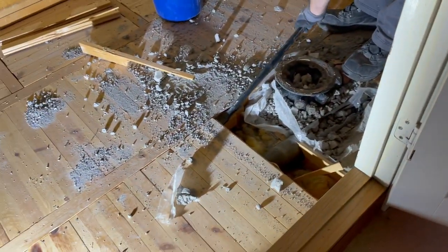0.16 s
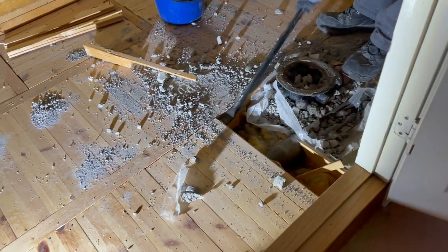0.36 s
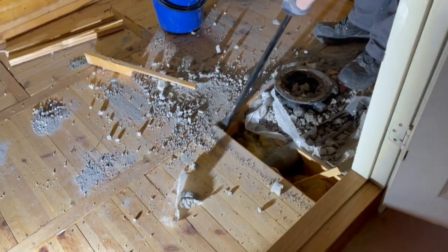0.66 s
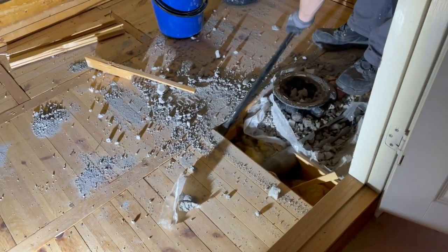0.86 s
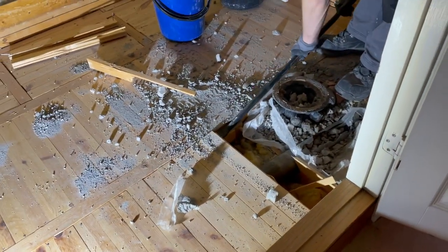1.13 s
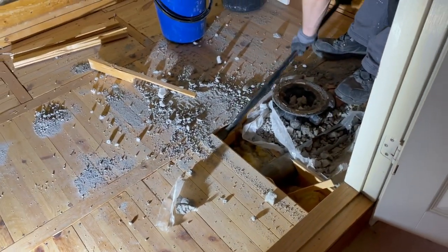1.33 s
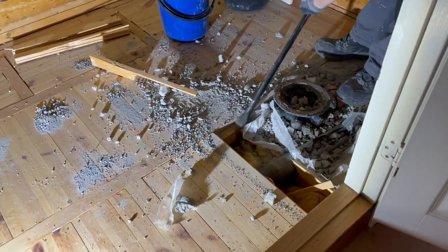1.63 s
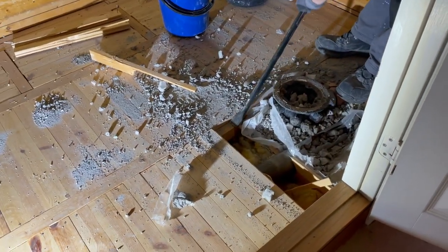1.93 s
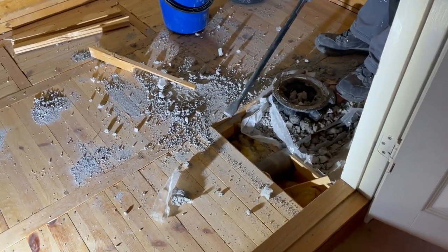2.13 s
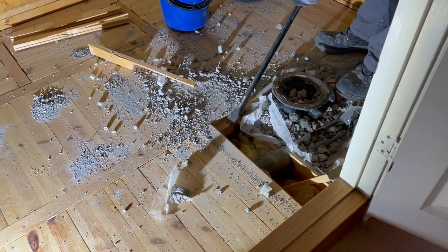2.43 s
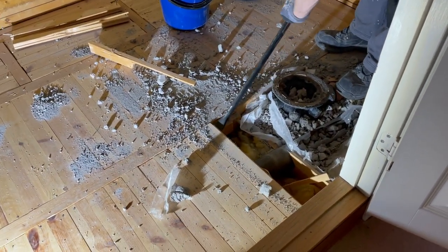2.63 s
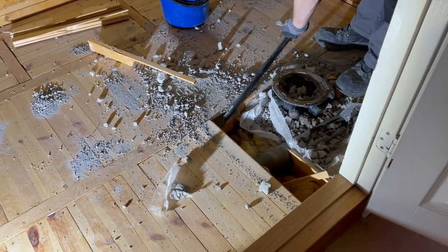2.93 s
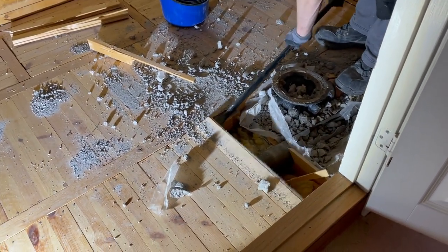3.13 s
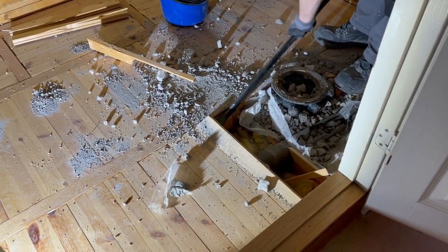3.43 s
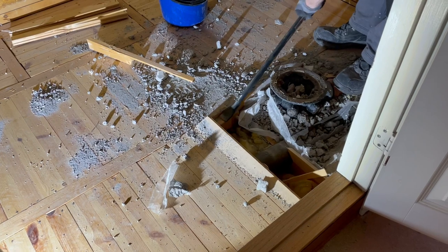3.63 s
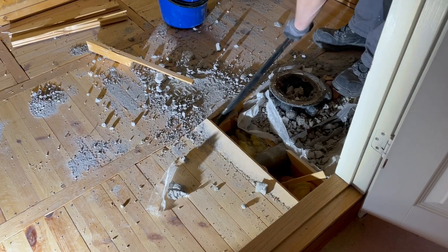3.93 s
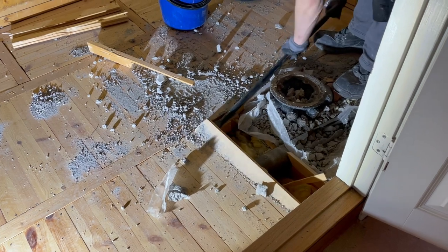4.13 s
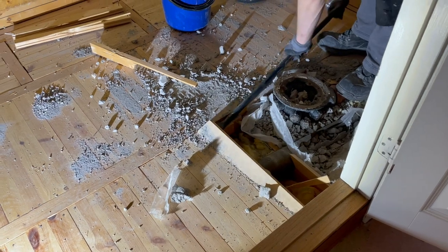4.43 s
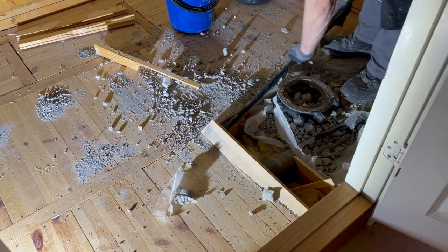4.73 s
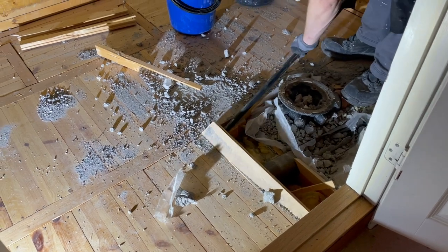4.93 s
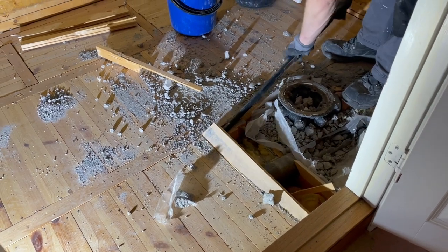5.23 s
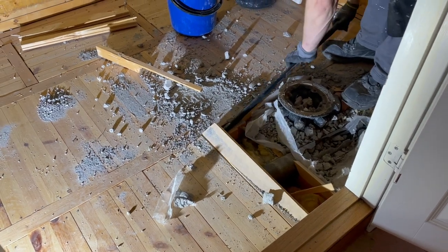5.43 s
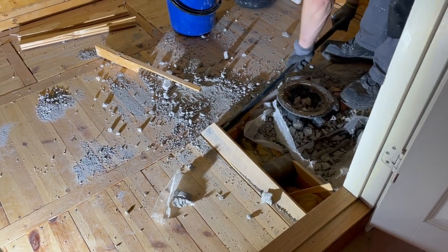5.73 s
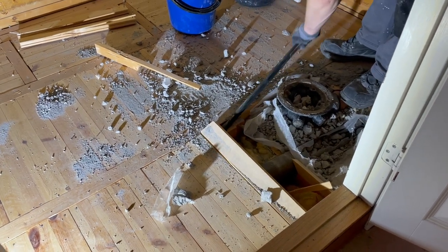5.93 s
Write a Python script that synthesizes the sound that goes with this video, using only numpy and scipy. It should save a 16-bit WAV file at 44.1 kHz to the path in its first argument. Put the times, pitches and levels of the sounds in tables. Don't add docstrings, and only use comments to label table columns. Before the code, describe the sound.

A steel bar jabs and pries under a hollow wooden floor, grinding through grit with heavy thuds, sharp cracks and skittering stone chips indoors.

```python
import sys
import numpy as np
from scipy import signal
from scipy.fft import rfft, irfft, next_fast_len
from scipy.io import wavfile
from scipy.ndimage import uniform_filter1d

SR = 44100
rng = np.random.default_rng(int(sys.argv[2]) if len(sys.argv) > 2 else 0)


def invert_db(x):
    u = np.asarray(x, float) / 20
    return 10 ** u


def unload_wav(signal):
    wavfile.write(
        sys.argv[1],
        SR,
        np.round(np.clip(np.atleast_2d(signal).T, -1, 1) * 32767).astype(np.int16),
    )


N = 268039
STEP = 64

# t/s, crack level/dB, joist boom level/dB, beam boom level/dB, board boom level/dB
BLOWS = [(0.491, -4.5, -24.5, -29.5, -51), (0.6926, 5, -9.5, -11, -6), (1.7237, -8, -20.5, -7.5, -7.5),
         (2.4579, -45, -20, -27, -30), (2.5249, -21, -27.5, -60, -22), (2.6301, 0, -7.5, -10.5, -6.5),
         (3.185, 3, -37, -30, -10), (3.7996, -15, -10.5, -13.5, 0), (4.121, -10, -20, -26, -16.5),
         (4.1706, -15, -31, -62, -35), (4.6027, 5.5, -94, -47, -20), (5.0417, -14.5, -17, -20, -27),
         (5.5162, -44, -48.5, -56, -27), (5.6171, -9, -39, -71, -24)]
# f/Hz, level/dB, t60/s
JOISTS = [(46.27, 4.5, 1), (59.2, -12, 0.71), (68, 7.5, 0.26), (84.4, 5, 0.43), (101.8, 8.5, 0.23)]
# f/Hz, level/dB, t60/s
BOARDS = [(141.5, 3, 0.4), (170.4, -5, 0.71), (182.4, 1.5, 0.36), (203.2, 3, 0.24), (222.2, -4, 0.4),
          (268, -2, 0.43), (369.5, -13.5, 0.64), (400.3, -8.5, 0.56), (466.6, -1.5, 0.18),
          (565, -0.5, 0.28), (596, -7.5, 0.33), (754, 0.5, 0.19), (1030, 7.5, 0.052)]
# f/Hz, level/dB
GRIT = [(800, -4.5), (1300, 7.5), (1750, -3.5), (2300, 5), (3300, 5.5), (4500, 2.5), (6000, -9.5),
        (9000, -8.5)]
# f/Hz, level/dB
DUST = [(6000, -19), (9000, -11), (11000, -21), (13800, -11), (15500, -23), (16300, -28.5), (17000, -69)]
# f/Hz, level/dB
RASP = [(150, 2), (300, 1), (600, -3), (1100, -11), (1500, -7.5), (2500, -36.5)]


def evened(x):
    return x / np.sqrt(np.mean(x ** 2) + 1e-20)


def read(points, hz):
    f, value = np.transpose(points)
    return np.interp(np.log(hz + 1), np.log(f + 1), value)


def add(mix, s, sound):
    part = mix[..., round(s * SR):][..., :sound.shape[-1]]
    part += sound[..., :part.shape[-1]]


def causal(points):
    level_db = read(points, abs(np.fft.fftfreq(2048, 1 / SR)))
    log_gain = np.log(invert_db(np.maximum(level_db, -90)))
    taps = np.fft.ifft(np.exp(np.conj(signal.hilbert(log_gain)))).real[:1024]
    return taps / np.linalg.norm(taps)


def colour(x, points):
    return signal.oaconvolve(x, causal(points))[:len(x)]


def ring(hz, t60, seconds):
    t = np.arange(round(seconds * SR)) / SR
    return invert_db(-60 * t / t60) * np.sin(2 * np.pi * hz * t)


def through(x, modes, damping):
    body = sum(invert_db(db) * ring(hz, damping * t60, .5) for hz, db, t60 in modes)
    return signal.oaconvolve(x, body / np.linalg.norm(body))[:len(x)]


def slip_sizes(spread_db):
    return invert_db(spread_db * np.minimum(rng.exponential(1, N), 5))


def grains(per_s, spread_db, length_s):
    size = slip_sizes(spread_db) * (rng.random(N) < per_s / SR)
    puffs = signal.lfilter([1], [1, -np.exp(-1 / (length_s * SR))], size)
    return evened(puffs * rng.standard_normal(N))


def stillness():
    # f/Hz, density level/dB per Hz
    air = [(28, -10), (48, 0), (78, -16), (200, -33), (700, -29), (2500, -36), (5000, -46), (16000, -58)]
    z = rfft(rng.standard_normal((2, N))) * invert_db(read(air, np.fft.rfftfreq(N, 1 / SR)))
    return invert_db(-56) * evened(irfft(z, N))


def bout(s, db, rise_s, fall_s, bend):
    t = np.arange(0, N + STEP, STEP) / SR - s
    drop_db = 20 * np.maximum(-t / abs(rise_s), t / abs(fall_s)) ** bend
    return invert_db(2 * np.maximum(db - drop_db, -140))


def strokes():
    # peak t/s, force level/dB, rise/s, fall over 20 dB/s, lean level/dB.
    pries = [
        (1.44, -51, 0.026, 0.52, 14),
        (1.55, -45.5, 0.14, 0.21, 18),
        (3.515, -45.5, .02, 0.16, 13),
        (3.6, -45, 0.077, .12, 12),
        (3.78, -28, 0.055, 0.1046, 7.5),
        (5.97, -46, 0.13, -4.5, 12),
    ]
    presses = [
        (0.4, -47, 0.064, 0.3, 8),
        (2.462, -49.5, 0.0052, 0.1, 12.5),
        (2.57, -46, 0.061, 0.05, 18.5),
        (4.06, -49.5, 0.074, 0.22, 10.5),
        (4.19, -44, .05, 0.13, 12.5),
        (4.618, -26, 0.057, 0.04, 11.5),
        (4.78, -53.5, .1, -0.13, 22.5),
        (5.06, -54, 0.46, -2.9, 15.5),
        (6.01, -48.5, 0.033, -12, 11),
    ]
    slides = [(0.02, -47.5, .05, 0.07, -8), (0.51, -38, 0.16, 0.38, -3), (0.626, -32, 0.028, 0.0048, 2.5),
              (0.671, -34, .07, -0.03, 4), (1.091, -42, 0.16, 0.12, -1), (1.38, -51.5, 0.12, 0.76, 5),
              (1.59, -35, 0.14, 0.0473, -4.5), (1.707, -53.5, 0.054, 0.42, 21),
              (2.622, -33.5, 0.067, 0, 6.5), (3.0, -46, 0.14, 0.3, 1), (3.12, -46.5, .08, -0.4, -6),
              (3.24, -41, 0.24, 0.15, -18.5), (3.4, -47.5, 0.087, 0.58, 2), (3.632, -41, 0.12, 0.1, 4.5),
              (4.15, -36, 0.13, 0.1139, -9), (5.25, -47, 0.067, 0.08, 0.5), (5.49, -47, 0.11, 0, -10.5),
              (5.619, -43, 0.25, 0, -18.5), (5.81, -44.5, 0.031, 0.2, -3.5)]
    # peak t/s, level/dB, rise/s, fall over 20 dB/s
    trickles = [
        (0.78, -57.5, .1, 0.1),
        (1.2, -63, .1, 1),
        (2.75, -61.5, .1, -2.5),
        (3.3, -50.5, 0.12, -1.5),
        (3.9, -65, 0.087, -0.3),
        (4.27, -51, .1, 0.15),
        (4.72, -50, 0.12, -1.1),
        (5.13, -77, 0.089, -0.2),
        (5.33, -62, 0.11, 0.1),
        (5.7, -55.5, .1, 1),
    ]
    roundness = 1.045
    pushes = pries + presses + slides
    lean_db = np.array([row[4] for row in pushes])
    power = np.array([bout(*row[:4], roundness) for row in pushes])
    leaning = invert_db(2 * lean_db)[:, None] * power
    rattle = sum(bout(row[0], row[4] - 24.5, 0.021, .32, 0.64) for row in BLOWS)
    fine = invert_db(2 * -34) * rattle + sum(bout(*row, roundness) for row in trickles)
    dust = invert_db(2 * (3 - 0.5 * lean_db)) @ power
    hum = leaning[:len(pries)].sum(0)
    gains = np.sqrt([rattle, fine, power.sum(0), dust, leaning.sum(0), hum])
    mean_lean_db = lean_db @ power / power.sum(0)
    contact_hz = 3200 * 2 ** (-mean_lean_db / 32)
    return [np.interp(np.arange(N) / STEP, np.arange(len(c)), c) for c in (*gains, contact_hz)]


def crunch(contact_hz, per_s, spread_db):
    clumps = invert_db(4.5 * evened(uniform_filter1d(rng.standard_normal(N), 500)))
    size = slip_sizes(spread_db) * (rng.random(N) < clumps * per_s / SR)
    kind, out = rng.integers(0, 14, N), np.zeros(N)
    for k, hz in enumerate(np.geomspace(900, 6000, 14)):
        near_db = -9 * np.log2(hz / np.maximum(contact_hz, 500)) ** 2
        grain = ring(hz, 11 / hz, .02)
        hits = size * (kind == k) * invert_db(near_db)
        out += signal.oaconvolve(hits, grain / np.linalg.norm(grain))[:N]
    return evened(out)


def grinding(grit, dust, rasp, pry, contact_hz):
    # f/Hz, level/dB, t60/s
    bar_modes = [(1150, 0, .04), (1520, -5, .03), (2150, -1, .03), (2420, -3, .03), (2750, -3, .03),
                 (3350, -3, .025), (3950, -5, .02), (4950, -8, .02)]
    scuffs = grains(per_s=700, spread_db=4.5, length_s=0.008)
    slips = grains(per_s=1500, spread_db=3.7, length_s=.0015) + .25 * rng.standard_normal(N)
    slow = uniform_filter1d(abs(scuffs), 700)
    clumps = invert_db(3 * np.clip(evened(slow - slow.mean()), -2, 2))
    grit = grit * evened(clumps)
    crushed = grit * crunch(contact_hz, per_s=1000, spread_db=3.6)
    bar = through(crushed + grit * slips, bar_modes, damping=.7)
    steel = .4 * colour(grit * slips, GRIT) + .7 * crushed + .4 * bar
    hum = invert_db(-11) * through(pry * scuffs, bar_modes[:1], damping=1.0)
    hiss = invert_db(-7.0) * dust * colour(slips, DUST)
    return steel + hum + hiss + invert_db(-8.5) * rasp * colour(scuffs, RASP)


def shaking(rasp):
    # t/s, level/dB
    load_points = [(0, -46), (0.27, -63), (0.44, -48.5), (0.85, -30), (1.05, -41), (1.32, -59.5),
                   (1.6, -36.5), (1.85, -29.5), (2.201, -64), (2.45, -88), (2.6, -39), (2.8, -36.5),
                   (3.3, -51.5), (3.95, -31), (4.5, -60.5), (5.12, -40.5), (5.5, -65.5), (6.078, -44.5)]
    load = invert_db(np.interp(np.arange(N) / SR, *np.transpose(load_points)))
    boards = np.hypot(invert_db(-5.5) * load, invert_db(-9) * rasp)
    pushes = grains(per_s=300, spread_db=1.8, length_s=.012)
    deep = through(load * pushes, JOISTS, damping=.45)
    low_boards = [mode for mode in BOARDS if mode[0] < 300]
    return deep + through(boards * pushes, low_boards, damping=.35)


def click(colours, db, hz, treble_db):
    t = np.arange(1200) / SR
    tumble = (1 - np.exp(-t / 0.00059)) * (np.exp(-t / 0.001) + 0.057 * np.exp(-t / 0.02))
    tick = rng.standard_normal(len(t)) * tumble
    stone = ring(hz, .005, .01) + .6 * ring(hz * rng.uniform(1.25, 1.6), .004, .01)
    body = 0.49 * np.pad(stone / np.linalg.norm(stone), (0, colours.shape[1] - len(stone)))
    knock_db = -12.0 - 9.8 * np.log2(hz / 1000)
    body = body + invert_db(np.array([-10.0, treble_db - 0.5, knock_db])) @ colours
    pan_db = 1.6 * rng.standard_normal()
    return invert_db(db + 3.0 + np.array([[pan_db], [-pan_db]])) * signal.fftconvolve(tick, body)


def blow(crack_db, *boom_db):
    floor_modes = JOISTS + BOARDS
    t = np.arange(round(.8 * SR)) / SR
    hiss, chance = rng.standard_normal(len(t)), rng.random((len(floor_modes), 2))
    burst = hiss * (1 - np.exp(-t / 0.0013)) * (np.exp(-t / 0.0017) + 0.12 * np.exp(-t / 0.023))
    crack = invert_db(crack_db - 10.5) * (colour(burst, GRIT) + 0.12 * colour(burst, DUST))
    boom_points = list(zip((50, 93, 200, 600), boom_db))
    boom = np.zeros(len(t))
    for (hz, db, t60), (turn, lift) in zip(floor_modes, chance):
        place_db = read(boom_points, hz) + db + 0.4 * (lift - .5)
        swell = 1 - np.exp(-(t * hz / 1.66) ** 2)
        fall = 1.3 * invert_db(-60 * t / (0.27 * t60)) + 0.16 * invert_db(-60 * t / t60)
        boom += invert_db(place_db - 3.5) * swell * fall * np.sin(2 * np.pi * (hz * t + turn))
    return crack, boom


def settling(rattle, fine):
    # f/Hz, level/dB
    after_rasp = [(150, -6), (300, -3.5), (500, 2), (900, -3.5), (1500, -8), (2500, -29)]
    buzz, sift = rng.standard_normal((2, N))
    falling = colour(sift, GRIT) + invert_db(-8.5) * colour(sift, DUST)
    return invert_db(-7.0) * rattle * colour(buzz, after_rasp) + fine * falling


def springing(db, hz, t60, rattle_hz):
    tone = ring(hz, t60, min(t60, .3))
    tone = tone * np.minimum(np.arange(len(tone))[::-1] / 900, 1)
    flutter = uniform_filter1d(rng.standard_normal(len(tone)), round(SR / rattle_hz / 2))
    return invert_db(db + 1.2 * evened(flutter)) * tone


def room(x):
    # f/Hz, t60/s
    decay_times = [(100, 0.42), (500, 0.42), (2000, 0.11), (6000, 0.21), (14000, 0.27)]
    taps = np.zeros((2, SR // 2))
    at = np.arange(200, SR // 2 - 20, 20) + rng.integers(0, 20, (2, (SR // 2 - 201) // 20))
    np.put_along_axis(taps, at, rng.choice([-1., 1.], at.shape), 1)
    hz, t, z = signal.stft(taps, SR, nperseg=256)
    decay = invert_db(-60 * t / read(decay_times, hz)[:, None])
    tail = signal.istft(z * decay, SR, nperseg=256)[1]
    return signal.fftconvolve(x[None], tail / np.linalg.norm(tail[0]), axes=1)[:, :N]


def scene():
    # t/s, peak level/dB, ring f/Hz.
    snaps = [(0.075, -28, 4470), (0.615, -24.5, 1580), (0.6933, -7.5, 1100), (0.956, -24.5, 3460),
             (1.3248, -31, 2480), (4.603, -14, 1170), (2.8472, -29.5, 3620), (3.1852, -4, 1460),
             (3.2613, -12.5, 2300), (3.3745, -10, 1390), (3.9766, -22.5, 2920), (4.1434, -16, 3440),
             (4.153, -10.5, 3840), (4.1709, -5, 1290), (4.5411, -23, 1160), (4.5678, -13, 3300),
             (4.582, -10, 1500), (4.9718, -24.5, 2470), (5.2374, -22, 2900), (5.278, -21, 1250),
             (5.3715, -29.5, 3660), (5.4337, -24, 3800), (5.4582, -17, 4600), (5.4712, -14.5, 3750),
             (5.5191, -14, 3560), (5.5977, -29.5, 4830), (5.6181, -12, 3700), (5.6687, -21.5, 4070),
             (5.781, -27, 4600), (5.7964, -12, 3770)]
    skips = [(0.0154, -30, 3200), (0.048, -31.5, 4480), (0.059, -23.5, 3310), (0.3041, -29, 3120),
             (0.3743, -22, 1277), (0.4201, -16.5, 1067), (0.4925, -9, 1790), (0.5243, -16, 1220),
             (4.8514, -29, 1030), (0.9118, -33.5, 3360), (0.9864, -19, 4360), (1.0632, -19, 3430),
             (1.1501, -18.5, 3400), (1.5732, -15.5, 1590), (3.0784, -20, 4420), (3.2014, 2, 2340),
             (3.5055, -17.5, 1280), (3.5592, -23.5, 1050), (3.6399, -28, 2240), (3.7587, -18, 2250),
             (3.9567, -20, 2880), (4.2127, -6, 3770), (4.4703, -29, 1310), (4.6114, -3.5, 1030),
             (5.0454, -11.5, 2440), (5.2251, -12, 2900), (5.4857, -18, 1155)]
    knocks = [(0.2084, -37, 3420), (0.9305, -19, 3500), (1.114, -20, 1220), (1.3913, -28.5, 2440),
              (1.43, -20.5, 1060), (1.6945, -12, 1890), (1.707, -17, 4440), (1.7232, -6, 2890),
              (2.4564, -22, 1680), (2.5247, -39, 2420), (2.6317, -2, 2180), (3.3566, -21, 2470),
              (3.5763, -24.5, 1160), (3.6202, -21, 2250), (3.7389, -17, 1200), (3.7871, -22.5, 2370),
              (3.802, -6.5, 3370), (4.07, -18, 2200), (4.1027, -11.5, 1084), (4.119, -12.5, 1184),
              (1.3373, -26.5, 2470), (4.6325, -11, 810), (4.999, -17.5, 1290), (5.2041, -17, 2380),
              (5.5687, -22.5, 3850), (5.9083, -18, 1570), (5.9497, -18.5, 2880), (5.964, -23.5, 1570),
              (5.9778, -21, 2890), (6.002, -17, 2980), (0.3488, -35.5, 3100), (0.4858, -24, 2680),
              (0.5484, -19, 3200), (1.3558, -33.5, 3960), (1.4551, -28, 2300), (1.479, -33, 1150),
              (1.5414, -20, 4400), (2.505, -37, 2600), (2.803, -42, 3570), (2.821, -45, 3600),
              (3.5416, -40, 1140), (3.66, -32.5, 3320), (3.7057, -42, 2740), (3.7142, -30.5, 1160),
              (4.034, -28, 2650)]
    more_skips = [(0.0262, -35, 3650), (0.038, -23, 3400), (0.0914, -33, 4270), (0.1106, -33, 3430),
                  (0.1316, -33, 3400), (0.2738, -47, 2900), (0.3294, -41.5, 2940), (0.3885, -26, 2670),
                  (0.8714, -38.5, 1030), (1.035, -36, 2280), (1.0962, -22.5, 2370), (1.1647, -31, 2150),
                  (2.9156, -27, 3800), (2.9609, -29.5, 3540), (2.9828, -24, 2160), (2.9947, -24, 2160),
                  (3.0114, -31, 1000), (3.025, -29, 2020), (3.0388, -33, 2360), (3.0976, -32, 3500),
                  (3.1295, -26, 1430), (3.1543, -26, 3960), (3.528, -42, 1150), (3.5962, -21.5, 2150),
                  (4.487, -45, 1440), (4.9604, -27, 1250), (4.9901, -20.5, 1160), (5.0148, -24, 1550),
                  (5.193, -24.5, 2100), (5.4133, -26.5, 3600), (5.8779, -27.5, 1200), (5.8984, -23, 1200),
                  (5.9169, -26, 1570), (5.9346, -23, 2740), (5.9849, -20, 2790), (6.0343, -29, 3920)]
    # t/s, joist boom level/dB, beam boom level/dB, board boom level/dB
    thumps = [
        (0.425, -48.5, -29.5, -31.5),
        (1.119, -30, -33, -30.5),
        (1.5, -37, -41.5, -27),
        (3.039, -36, -34.5, -34.5),
        (3.43, -41, -42, -40),
        (4.654, -45, -17, -22),
        (5.285, -58, -30, -40.5),
        (5.42, -45.5, -33.5, -38),
        (6.029, -52, -26.5, -35),
        (4.617, -48, -35, -14),
    ]
    # t/s, level/dB, f/Hz, t60/s, rattle f/Hz
    ringing_modes = [(4.174, -35.5, 729, 1.0, 30), (4.171, -17, 722, .09, 100), (4.169, -21, 590, .06, 200),
                     (4.169, -22, 850, .06, 200), (4.169, -22, 1150, .06, 200), (3.802, -16, 1030, .05, 200),
                     (1.63, -49, 3950, .15, 300), (3.613, -33, 2200, .12, 200), (3.757, -30, 2180, .08, 200),
                     (3.76, -34, 3320, .1, 200), (1.572, -38, 4950, .16, 400), (1.568, -43, 13050, .2, 300),
                     (1.568, -43, 14150, .2, 300), (1.568, -45, 15350, .2, 300)]
    upper_db = -11
    rattle, fine, *effort = strokes()
    grit, floor = grinding(*effort), shaking(np.hypot(effort[2], rattle))
    near = np.array([grit, grit])
    colours = np.array([causal(points) for points in (GRIT, DUST, RASP)])
    for stones, treble_db in ((snaps, -2.5), (skips, -13), (knocks, -26), (more_skips, -13)):
        for s, *row in stones:
            add(near, s, click(colours, *row, treble_db))
    for s, *boom_db in thumps:
        add(floor, s, blow(-90, *boom_db, np.mean(boom_db[-2:]) + upper_db)[1])
    for s, *strength in BLOWS:
        crack, boom = blow(*strength, np.mean(strength[-2:]) + upper_db)
        add(near, s, crack)
        add(floor, s + 0.003064, boom)
    near = near + settling(rattle, fine)
    for s, *row in ringing_modes:
        add(near, s, springing(*row))
    return near + floor + invert_db(-4.0) * room(near.mean(0) + .5 * floor) + stillness()


def thinned(x):
    hz, _, z = signal.stft(np.array([x[0] + x[1], x[0] - x[1]]) / 2, SR, nperseg=1024)
    power = (abs(z[:, hz > 2000]) ** 2).sum((0, 1))
    usual = uniform_filter1d(power, 9)
    calm, no_burst = power < invert_db(5.0) * usual, power < invert_db(24.0) * usual
    edge = rng.random((3, len(power) // 4 + 1)).repeat(4, 1)[:, :len(power)]
    f = hz[:, None]
    z[0][(f > 7600 + 900 * edge[0]) & (f < 9300 + 600 * edge[1]) & calm] = 0
    z[1][(f > 11600 + 1200 * edge[2]) & no_burst] = 0
    z[:, hz > 16900] *= .03
    mid, side = signal.istft(z, SR, nperseg=1024)[1][:, :N]
    return np.array([mid + side, mid - side])


def band_limit(x):
    return signal.sosfilt(signal.butter(12, 17000, fs=SR, output="sos"), x)


def record(dry):
    # f/Hz, level/dB
    limits = [(20, -24), (34, -6), (45, 0), (15900, 0), (16300, -14), (16900, -45)]
    # f/Hz, side level/dB
    side_levels = [(30, -21.5), (100, -13.5), (250, -3), (600, 1), (1500, 4.5), (4000, 3.5), (8500, -4),
                   (13000, 11.5)]
    # f/Hz, phase/rad
    port_lead = [(100, 0), (2000, .2), (3300, .9), (5000, .2), (6500, -1.2), (8600, -3.14), (12300, -6),
                 (14000, -6.3)]
    size = next_fast_len(N + 4096)
    hz = np.fft.rfftfreq(size, 1 / SR)
    left, right = rfft(dry, size) * invert_db(read(limits, hz))
    mid, side = (left + right) / 2, (left - right) / 2 * invert_db(read(side_levels, hz))
    left_port = invert_db(4.0) * (mid + side) * np.exp(1j * read(port_lead, hz))
    right_port = invert_db(3.0) * (mid - side)
    x = irfft(np.array([left_port, right_port]), size)[:, :N]
    overloaded = x / (1 + (x / .9) ** 4) ** (1 / 4)
    return band_limit(thinned(overloaded))


dry = scene()
out = record(dry)
unload_wav(out)
```